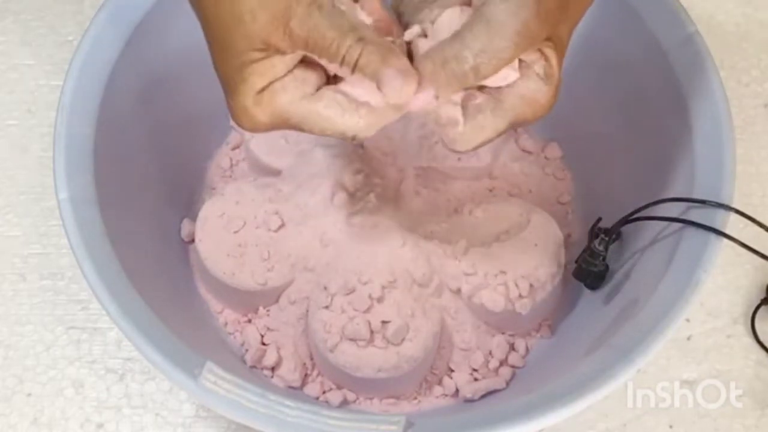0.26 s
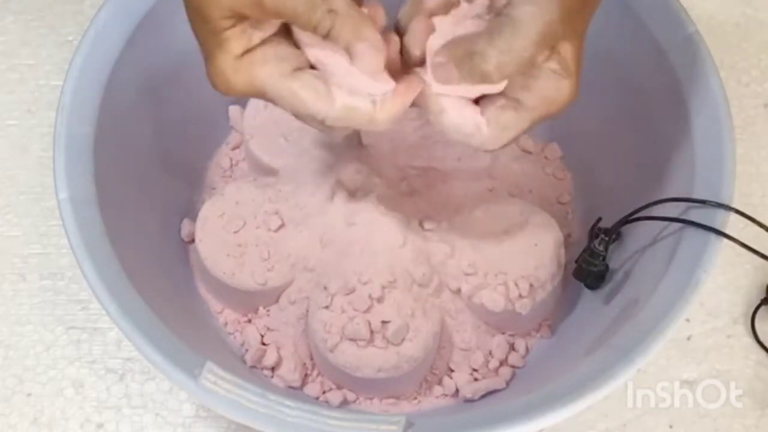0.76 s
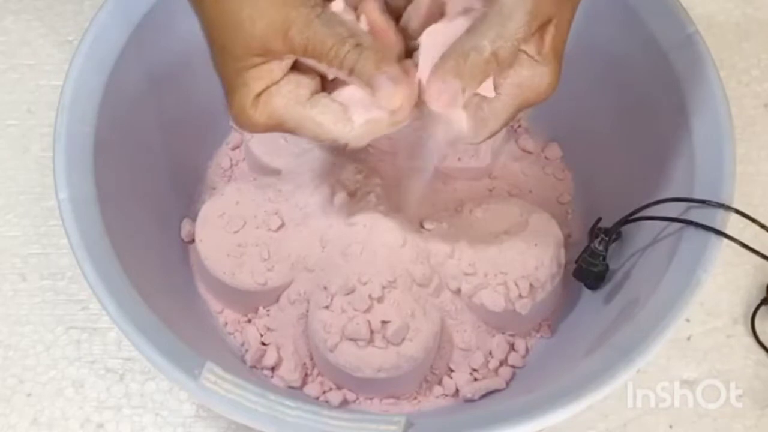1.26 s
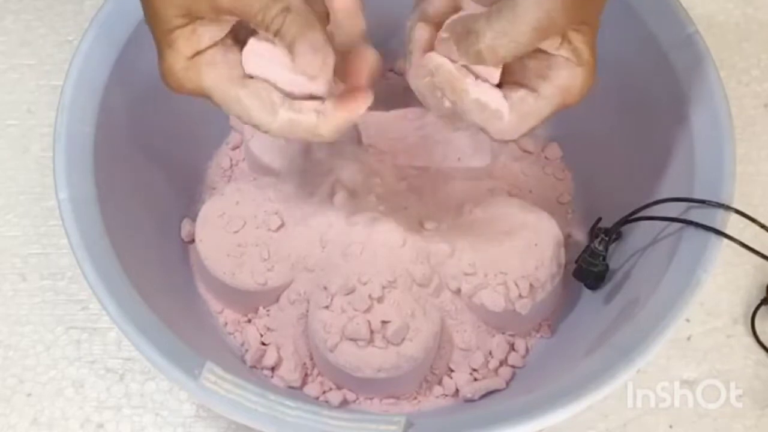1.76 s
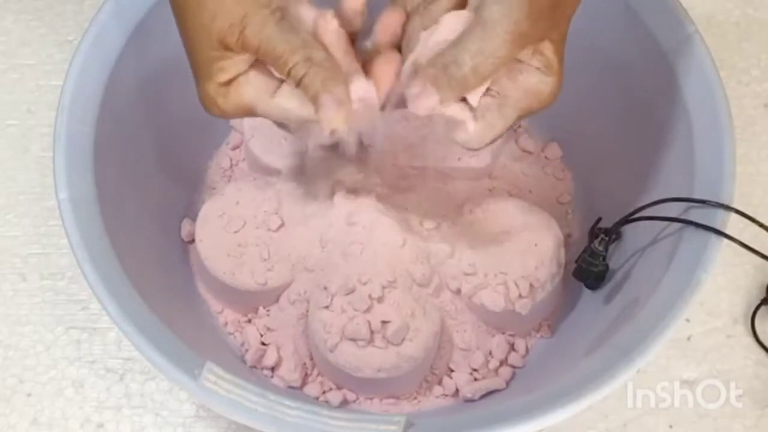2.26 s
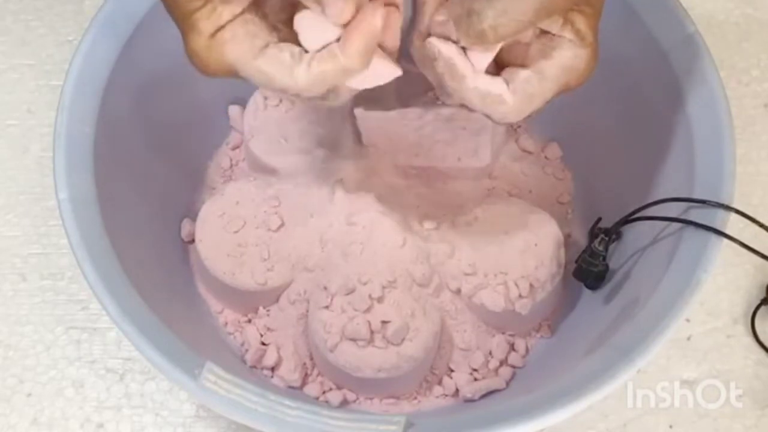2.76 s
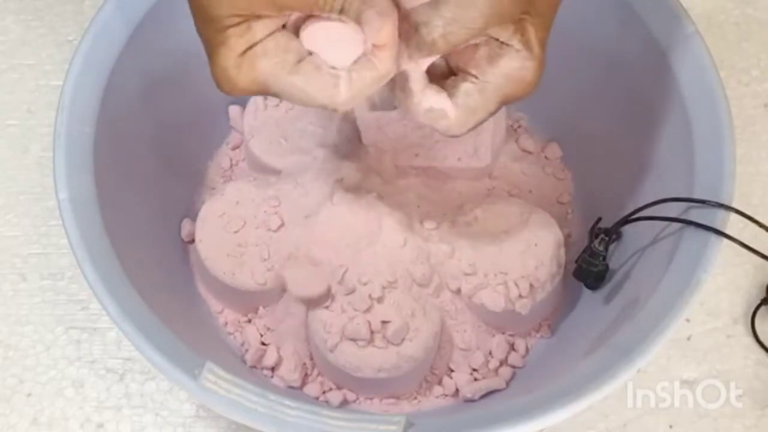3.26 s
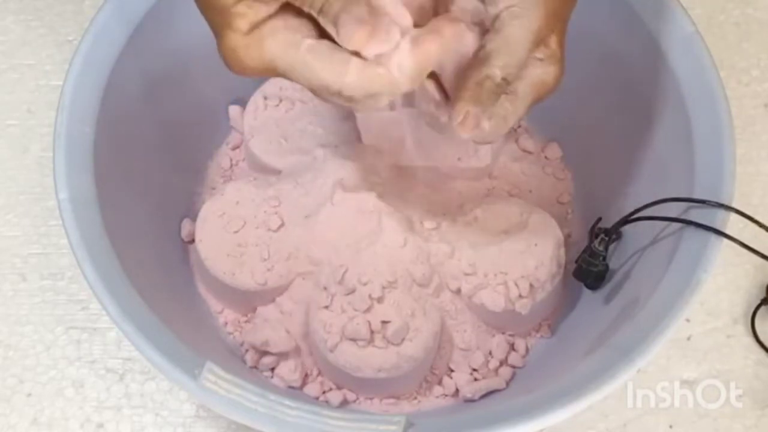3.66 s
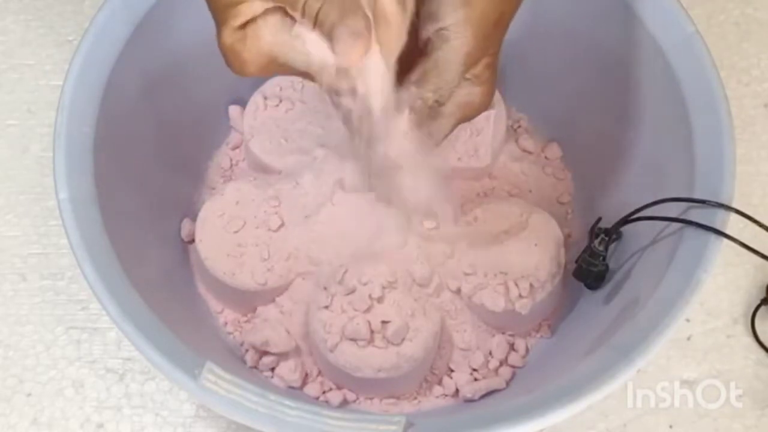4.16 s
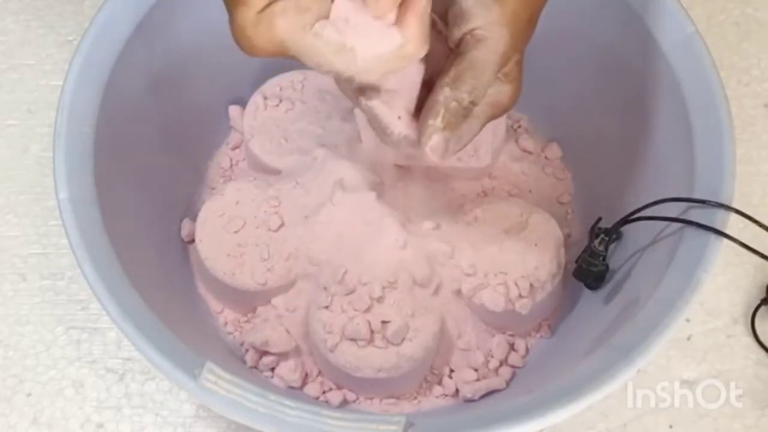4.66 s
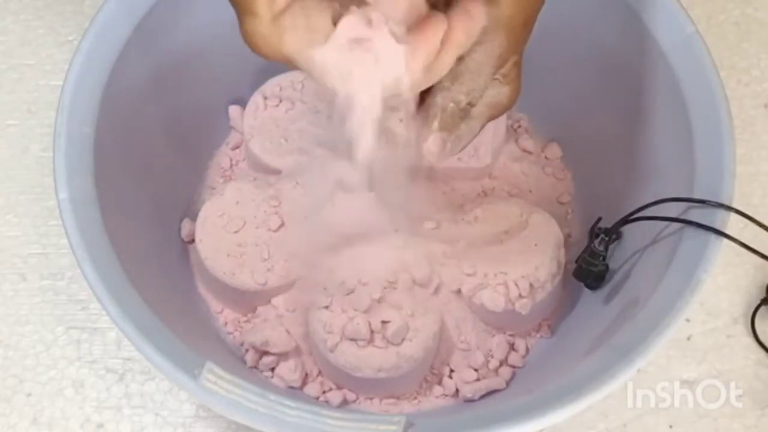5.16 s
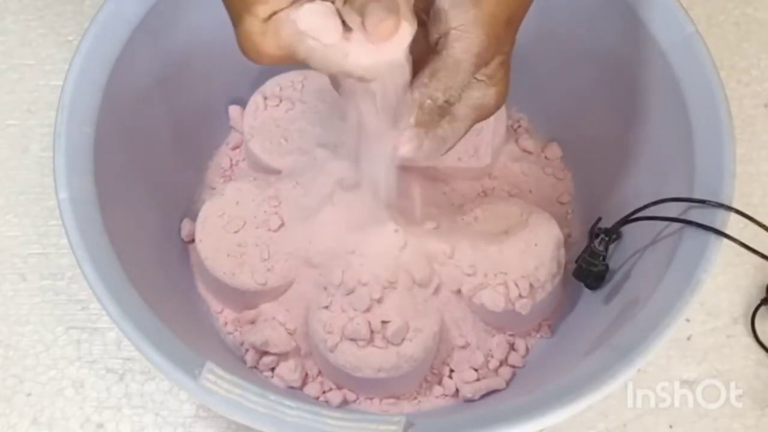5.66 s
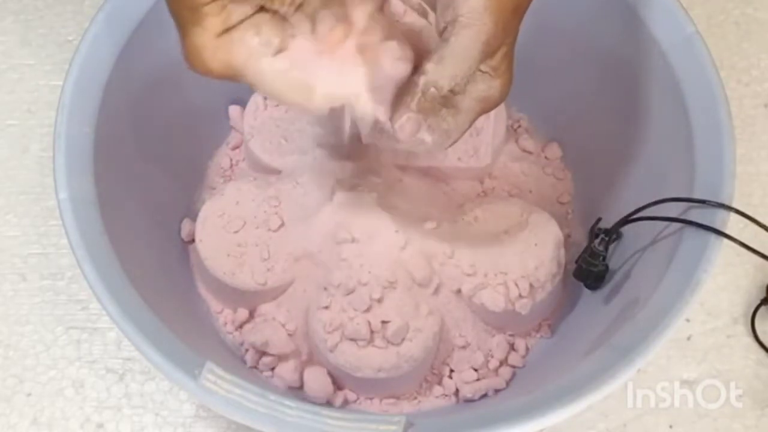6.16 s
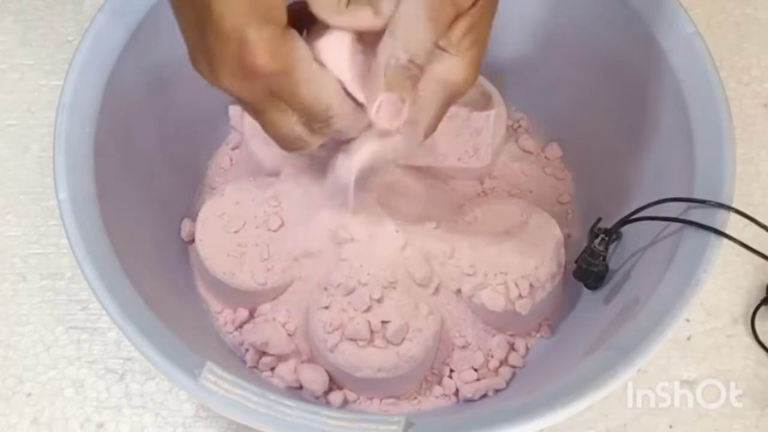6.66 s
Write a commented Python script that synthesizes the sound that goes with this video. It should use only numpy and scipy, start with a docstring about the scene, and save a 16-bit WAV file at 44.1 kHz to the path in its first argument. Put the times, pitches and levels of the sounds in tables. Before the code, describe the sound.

In a quiet room, a small microphone against a plastic tub hears powder cakes crumbled by hand. From 0 to 0.2 s several small hollow knocks and faint ticks open over soft, hissy sifting. Until 3 s it stays gentle: grainy powder comes in flurries, with light taps near 1.7, 1.9 and 2.1 s and a faint low wavering hum around 1.2 to 2.2 s. At 3.2 s a firm dull knock lands, followed at 3.4 s by a crunchy cluster of snaps and a brief rattle. Smaller drops follow around 4.3 s, then a bright hard crack at 4.63 s. From 5.1 to 5.7 s a dull, lumpy low rush suggests the tub shaken. Sharp cracks hit at 5.7 and 5.8 s, then the loudest ringing clatter at 6.0 to 6.2 s, with low rumble. Powder patters to 6.4 s, thinning into faint taps and quiet by 6.9 s.

```python
"""In a quiet room, hands crumble pressed powder cakes over a plastic tub, a small mono microphone against its wall.
Powder sifts down as shaped grainy noise; lumps snap and drop in as damped sines with debris noise, ringing the wall.
Under them the tub rocks, booms and rumbles in bands of low noise, and dry cracks are short noise bursts.
A low wavering sine hums for a moment, resonant grains rattle, and shaped grainy noise makes a dull, lumpy low rush,
as of the tub being shaken."""
import sys
import numpy as np
from scipy import signal
from scipy.fft import rfft, irfft, next_fast_len
from scipy.io import wavfile
from scipy.ndimage import map_coordinates

SR = 44100
rng = np.random.default_rng(int(sys.argv[2]) if len(sys.argv) > 2 else 0)


def unload_audio(sound):
    """Save the sound as a 16-bit wav file, at the path given as the first command line argument."""
    columns = np.transpose(np.atleast_2d(sound))
    # keep every value between -1 and 1, then stretch to whole-number steps
    steps = np.round(np.clip(columns, -1, 1) * 32767)
    wavfile.write(sys.argv[1], SR, steps.astype(np.int16))


N = 305172


def amp(db):
    """Decibels to linear gain."""
    return 10 ** (np.asarray(db) / 20)


def unit(x):
    """x scaled to rms 1."""
    return x / np.sqrt(np.mean(x ** 2) + 1e-20)


def curves(rows):
    """One value per sample for each column after the time."""
    s, *cols = np.transpose(rows)
    return [np.interp(np.arange(N) / SR, s, c) for c in cols]


def wobble(rate):
    """A smooth random curve, rate knots a second."""
    knots = rng.standard_normal(int(N * rate / SR) + 4)
    return map_coordinates(knots, [np.arange(N) * rate / SR])


def during(rows, fade):
    """1 while a table runs, fading at both ends over fade seconds."""
    t = np.arange(N) / SR
    fade_in = np.clip((t - rows[0][0]) / fade, 0, 1)
    fade_out = np.clip((rows[-1][0] - t) / fade, 0, 1)
    return fade_in * fade_out


def filtered(x, response):
    """x times a response of frequency."""
    m = next_fast_len(N + SR // 2)
    return irfft(rfft(x, m) * response(np.fft.rfftfreq(m, 1 / SR)), m)[..., :N]


def coloured(x, points):
    """x shaped by (Hz, dB) points on a log axis, at rms 1."""
    f, db = np.transpose(points)
    return unit(filtered(x, lambda hz: amp(np.interp(np.log(hz + 1), np.log(f + 1), db))))


def resonant(x, hz, q):
    """x through one resonance, at rms 1."""
    return unit(signal.lfilter(*signal.iirpeak(hz, q, SR), x))


def edge(hz):
    """A treble edge, falling to nothing at 11950 Hz; three short hiss bursts are cut to lie past it."""
    return np.clip((11950 - hz) / 300, 0, 1)


def patter(rate, spread_db, share):
    """Tiny impacts of widely spread size, rate a second, mixed into smooth noise by their share of the power."""
    chance, size = rng.random(N), rng.exponential(size=N)
    sign, smooth = rng.standard_normal(N), rng.standard_normal(N)
    grains = unit((chance < rate / SR) * amp(spread_db * size) * sign)
    share = np.clip(share, 0, 1)
    return np.sqrt(share) * grains + np.sqrt(1 - share) * smooth


def place(s, t):
    """Samples of an event; the contact builds up briefly before it sounds."""
    start = round((s + 0.001137) * SR)
    return slice(start, start + len(t))


def ringing(table, t, hz, reach_db, t60):
    """Damped sines at slightly new strengths; modes far from the blow's pitch lose reach_db per octave."""
    scatter_db = rng.normal(0, 1.5, len(table))
    total = 0
    for (f, db, decay), extra in zip(table, scatter_db):
        distance_octaves = abs(np.log2(f / hz))
        level_db = db + extra - reach_db * distance_octaves - 60 * t / (t60 * decay)
        total = total + amp(level_db) * np.sin(2 * np.pi * f * t)
    return total


def burst(t, length):
    """A noise envelope that swells briefly to 1 and dies, about 44 dB down after length seconds."""
    u = t * np.log(1000) / length * 1.18
    return u * np.exp(1 - u)


def shake():
    """The tub rocks below hearing, booms and rumbles as the heap shifts; a shove raises all three and dies away."""
    # The tub under the microphone. Each row: time in seconds, rocking, boom and wall rumble levels in dB.
    shake_levels = [(0, -40, -53, -56), (.1, -32, -52, -69), (.4, -34, -57.5, -69), (1, -34, -50, -61),
                    (1.15, -33, -62, -71), (1.6, -34.5, -58, -56), (2.3, -34, -63, -60),
                    (2.42, -36, -58, -57), (2.77, -44.5, -66.5, -68), (3.05, -24, -43, -72),
                    (3.2, -33.5, -46, -52), (3.38, -26, -47, -48.5), (3.64, -50, -59, -68),
                    (3.81, -26.5, -56, -63), (4.1, -36.5, -59.5, -61.5), (4.35, -37.5, -57, -56),
                    (4.5, -30, -61, -63), (4.66, -34, -37, -45), (4.9, -33.5, -64, -68),
                    (5.0, -27, -46, -51), (5.8, -39, -68, -60), (6.03, -25.5, -52.5, -53),
                    (6.1, -43, -55, -30.5), (6.3, -35, -43.5, -55), (6.37, -45, -58, -65.5),
                    (6.61, -27, -56.5, -65.5), (6.92, -34, -60, -62)]
    # The tub is pushed. Each row: start in seconds, nominal seconds to fall 10 dB,
    # then what it adds to rocking, boom and wall rumble in dB.
    shoves = [(1.17, 0.75, -19, -55, -44.5), (5.1, 0.28, -12, -40, -29)]
    # How fast rocking, boom and rumble die, one factor each on the shove's rate of fall.
    settles = [1.12, 0.81, 4.3]
    # Spectra of the three bands. Each row: frequency in Hz, density in dB per Hz.
    rocking_spectrum = [(2, -11), (5, -4.5), (12, -4.5), (20, -11), (30, -17), (42, -31.5), (70, -120)]
    boom_spectrum = [(20, -120), (38, -21), (55, 7.5), (76, 2), (105, 5), (130, -19), (180, -120)]
    rumble_spectrum = [(80, -120), (115, -5), (170, 1.5), (240, -0.5), (340, -13.5), (500, -120)]
    shove_rise_s = 0.041

    level = amp(curves(shake_levels))
    for s, fall_s, *peak_db in shoves:
        since = np.clip(np.arange(N) / SR - s, 0, None)
        rise = np.clip(since / shove_rise_s, 0, 1)
        fall = amp(-10 * np.outer(settles, since) / fall_s)
        level = level + amp(peak_db)[:, None] * rise * fall

    rocking = level[0] * coloured(rng.standard_normal(N), rocking_spectrum)
    rocking = filtered(rocking, lambda f: 1 / (1 + (f / 30) ** 6))  # a heavy tub cannot move fast
    boom = level[1] * amp(1.8 * wobble(9)) * coloured(rng.standard_normal(N), boom_spectrum)
    rumble_grains = patter(67, 0.91, share=0.31)
    rumble = level[2] * amp(2.9 * wobble(24)) * coloured(rumble_grains, rumble_spectrum)
    return rocking + boom + rumble


def powder():
    """Coarse bits excite the heap and wall, dust hisses; all come in shared flurries."""
    # Coarse powder falling. Each row: time in seconds, heap level in dB, crumbs level in dB.
    heaping = [(0, -50, -53), (.1, -53, -52), (.29, -54, -55), (.44, -56.5, -57.5), (.96, -52, -51),
               (1.25, -54.5, -58.5), (1.55, -56.5, -55), (1.75, -51.5, -52), (1.89, -50.5, -48.5),
               (2.04, -52, -50), (2.17, -48.5, -47.5), (2.35, -56, -57), (2.81, -58.5, -57),
               (3.35, -47, -52.5), (3.51, -62, -56), (3.72, -56, -56.5), (3.97, -56, -52.5),
               (4.22, -52.5, -53.5), (4.37, -63, -60), (4.57, -47.5, -51.5), (4.7, -55, -52),
               (5.0, -56, -55.5), (5.2, -39.5, -59), (5.34, -38.5, -57.5), (5.65, -43, -52),
               (5.8, -51.5, -49.5), (5.9, -46.5, -44), (6.05, -52, -63), (6.23, -47, -45),
               (6.3, -41.5, -51), (6.4, -51, -49.5), (6.47, -52.5, -59), (6.92, -54.5, -55.5)]
    # Fine dust sifting through the fingers. Each row: time in seconds, level in dB.
    dustfall = [(0, -48), (.3, -46.5), (.55, -46.5), (.66, -46), (.8, -49), (1.06, -46), (1.27, -53),
                (1.52, -52), (1.7, -51.5), (1.9, -47.5), (2.15, -45), (2.32, -49), (2.62, -70),
                (2.87, -51.5), (3.13, -50), (3.4, -46.5), (3.5, -53.5), (3.8, -52.5), (3.89, -65),
                (4.02, -46.5), (4.18, -42), (4.35, -46), (4.54, -45), (4.7, -51.5), (4.9, -52.5),
                (5.01, -42), (5.17, -54), (5.5, -54.5), (5.72, -49), (5.86, -37), (6.02, -53.5),
                (6.2, -39.5), (6.38, -44), (6.48, -65), (6.69, -50), (6.92, -60)]
    # The sifting thins for a moment as the fingers shift their grip.
    # Each row: centre in seconds, depth in dB, half width in seconds (to 1/e of the depth).
    lulls = [(.24, 6, 0.027), (0.359, 15, 0.024), (.47, 16, 0.043), (.63, 7.5, 0.059), (.77, 9, 0.02),
             (1.41, 12, 0.035), (1.61, 8, 0.055), (2.26, 7, 0.013), (2.43, 12, 0.071), (2.56, 0, 0.013),
             (2.78, 1.5, 0.043), (3.31, 7, 0.043), (3.59, 13, 0.039), (3.73, 4, 0.02), (4.28, 11.5, 0.07),
             (4.42, 11, 0.082), (4.62, 4, 0.01), (5.1, 19, 0.044), (5.23, 13, .03), (5.91, 15, 0.071),
             (6.272, 15.5, 0.093), (6.541, 22, 0.038), (6.75, 5, .03)]
    # Spectra of the three layers. Each row: frequency in Hz, density in dB per Hz.
    heap_spectrum = [(220, -120), (320, -14), (440, -5.5), (570, 0), (760, -10.5), (920, -4.5), (1150, -19),
                     (1700, -32.5), (2600, -120)]
    crumbs_spectrum = [(800, -120), (1150, -4), (1600, 1.5), (2100, -2.5), (2800, -6.5), (3400, -7.5),
                       (4700, -17), (7000, -120)]
    dust_spectrum = [(2500, -120), (4600, -24.5), (6200, -11), (7800, -7.5), (9400, -3), (10800, -6.5),
                     (11650, -16), (12100, -79)]
    crumbs_follow, heap_follows = 0.41, 0.16  # share of a lull that the coarser layers take

    heap_db, crumbs_db = curves(heaping)
    dust_db, = curves(dustfall)
    flurry = wobble(15) + 1.09 * wobble(55)
    t = np.arange(N) / SR
    lull_db = sum(db * np.exp(-((t - s) / half) ** 2) for s, db, half in lulls)

    heap_level = amp(heap_db - heap_follows * lull_db + 0.82 * flurry)
    heap = heap_level * coloured(patter(300, 3.1, share=0.32), heap_spectrum)
    crumbs_level = amp(crumbs_db - crumbs_follow * lull_db + 1.8 * flurry)
    crumbs = crumbs_level * coloured(patter(900, 2.2, share=0.15), crumbs_spectrum)
    dust_level = amp(dust_db - lull_db + 1.6 * flurry)
    dust = dust_level * coloured(patter(3400, 0.89, share=0.38), dust_spectrum)
    return heap + crumbs + dust


def room_tone():
    """The quiet room and the microphone's own hiss, as steady shaped noise."""
    # Spectrum of the stillness. Each row: frequency in Hz, density in dB per Hz.
    still_spectrum = [(18, -29), (30, -2.5), (45, -20), (65, -24), (131, -18), (345, -13), (554, -27.5),
                      (890, -16), (1090, -44), (1620, -46.5), (4610, -33.5), (9500, -26), (11600, -33),
                      (15100, -74.5), (22000, -120)]
    still_db = -57.5  # rms ahead of the treble edge
    return amp(still_db) * filtered(coloured(rng.standard_normal(N), still_spectrum), edge)


def lumps():
    """Each blow rings the wall near its own pitch, thuds the floor, chatters and sheds debris noise."""
    # Lumps snapping and landing. Each row: time in seconds, blow level in dB, favoured ring pitch in Hz,
    # thud and debris in dB relative to the blow, ring t60 in seconds, narrowness in dB lost per octave.
    blows = [(0.018, -18, 525, -15.5, -23.5, 0.028, 35), (0.041, -32, 1800, -28, -25, 0.042, 26),
             (0.07, -14, 840, -16.5, -25, 0.0194, 15), (0.171, -17.5, 556, -19, -26, 0.025, 22.5),
             (0.615, -34.5, 885, -5, -24, 0.029, 14), (1.004, -39, 880, -7, -32, .028, 18),
             (1.171, -38.5, 620, -2, -5, 0.017, 18.5), (1.705, -31, 1890, -24, -28, 0.069, 21),
             (1.891, -28.5, 1770, -32, -27, 0.037, 29), (2.111, -30, 606, -6.5, -28.5, 0.024, 14),
             (3.013, -22.5, 502, -8.5, -20.5, 0.031, 12), (3.229, -5, 540, -29, -29, 0.021, 24),
             (3.278, -29, 560, -23, -12.5, 0.029, 20.5), (3.36, -33.5, 818, -16, -9, .028, 20),
             (3.384, -22.5, 1330, -23, -22, .04, 15), (3.408, -13, 1490, -9, -13.5, 0.029, 27),
             (3.428, -31, 1400, -26, -31, 0.038, 7), (3.431, -13, 1540, -13, -32, 0.028, 15),
             (3.447, -25, 1330, -11, -41.5, .035, 10), (3.472, -35, 1320, -7.5, -36, 0.037, 17),
             (3.857, -25.5, 560, -5.5, -30, 0.033, 24), (3.882, -30, 526, -2, -11, 0.024, 28),
             (4.092, -27, 690, -27, -18, 0.014, 9.5), (4.258, -28.5, 950, -13, -19, 0.022, 19),
             (4.286, -34, 584, -15, -28, .021, 16), (4.299, -22, 870.5, -27, -45.5, .033, 38),
             (4.354, -20.5, 526, -13.5, -19.5, 0.025, 10), (4.379, -34, 480, -32, -15, 0.059, 7),
             (4.634, -2.5, 1900, -36, -31, .022, 19.5), (4.635, -13, 880, -38, -40, 0.0245, 36),
             (4.698, -33.5, 550, -18, -5, 0.015, 16), (4.762, -21, 640, -13.5, -38, 0.02, 18),
             (4.993, -30, 530, -24, -12, 0.021, 18), (5.235, -25, 533, -9, -27, 0.017, 10),
             (5.278, -33, 834, -3, -6, 0.017, 18), (5.507, -25.5, 498, -27.5, -22, 0.035, 10.5),
             (5.512, -21, 520, -9, -30, 0.02, 30), (5.55, -33, 608, -0.5, -33, 0.032, 8),
             (5.693, -27, 1300, -18, -30, 0.023, 15), (5.708, -8.5, 2020, -48, -26.5, 0.04, 19.5),
             (5.76, -25.5, 1350, -20, -12, 0.022, 14.5), (5.808, -9.5, 2300, -31, -27.5, 0.047, 18.5),
             (6.004, -27, 860, -25.5, -7.5, 0.025, 11), (6.009, -21, 460, -3, -36.5, 0.039, 14.5),
             (6.02, -17, 496, -19, -42, .02, 10.5), (6.028, -12, 2240, -30, -45.5, 0.019, 19),
             (6.051, -19, 1310, -6.5, -18, 0.0204, 16), (6.08, 11, 1200, -25.5, -31.5, 0.038, 16),
             (6.099, -5.5, 834, -15, -54.5, 0.037, 27), (6.119, -22.5, 1260, -5, -22, 0.048, 18),
             (6.133, -16.5, 1220, -16.5, -20, 0.048, 12), (6.133, -11.5, 536, -20, -30, 0.024, 13),
             (6.158, -14.5, 545, -25, -23.5, 0.02, 21), (6.174, -23.5, 1320, -25, -25, .035, 18.5),
             (6.181, -18.5, 1290, -8.5, -22.5, 0.022, 27), (6.304, -23.5, 590, -12.5, -25, .022, 9.5),
             (6.367, -33, 1400, -43, -18.5, .024, 19.5), (6.634, -37, 665, -12.5, -10.5, 0.044, 23),
             (6.756, -34.5, 826, -34, -15, 0.021, 13)]
    # Modes of the tub wall. Each row: frequency in Hz, strength in dB, decay relative to the blow's t60.
    wall_modes = [(551, 8.5, 0.6), (716, 0.5, .8), (881, 2, 0.71), (1110, -11, 1), (1290, 3, 0.71),
                  (1496, -2.5, 0.68), (1898, 4.5, 0.38), (2255, -5.5, 0.93), (2840, 3.5, 0.31),
                  (3420, -3.5, 0.63), (4734, 13.5, 0.34)]
    # Modes of the tub floor. Each row: frequency in Hz, strength in dB, decay relative to the thud's t60.
    floor_modes = [(74.5, -0.95, 1.6), (104, -0.41, 1.73), (132, 1, 1.75), (203, 1, 1.18), (305, -2, 0.69)]
    # Spectrum of the debris. Each row: frequency in Hz, density in dB per Hz.
    debris_spectrum = [(150, -120), (300, 5.5), (570, 4.5), (760, -1), (920, 6.5), (1100, -10), (1350, 2.5),
                       (2100, -5), (3000, -14.5), (4500, -23), (9000, -29), (11650, -49), (12100, -89)]
    # chatter relative to a blow at -16 dB; falls further behind harder blows, dB per dB
    chatter_db, chatter_sinks = -27, .3
    rise_cycles = 0.47  # time constant of the wall's build-up, in cycles of the blow's pitch

    t = np.arange(SR // 3) / SR
    ring, debris = np.zeros((2, N + SR))
    for s, db, hz, thud_db, debris_db, t60, narrow_db in blows:
        wall = -ringing(wall_modes, t, hz, narrow_db, t60)
        wall = wall * (1 - np.exp(-t * hz / rise_cycles))
        floor = -ringing(floor_modes, t, 150, 2.3, 0.069)
        floor = floor * (1 - np.exp(-t / 0.00077))
        chatter_level = amp(chatter_db - chatter_sinks * (db + 16) - 60 * t / 0.18)
        chatter = chatter_level * resonant(rng.standard_normal(len(t)), hz, q=21)
        chatter = chatter * (1 - np.exp(-t / 0.0019))
        ring[place(s, t)] += amp(db) * (wall + amp(thud_db) * floor + chatter)
        debris[place(s, t)] += amp(db + debris_db - 60 * t / 0.21) * (1 - np.exp(-t / 0.0006))

    # the debris comes down in uneven clumps
    clumps = amp(3 * wobble(110))
    shed = debris[:N] * clumps * coloured(patter(500, 1.7, share=0.32), debris_spectrum)
    return filtered(ring[:N] + shed, edge)


def cracks():
    """Short broad bursts of noise, each tilted to its own centre; faint ones fall at random."""
    # Dry cracks. Each row: time in seconds, level in dB, centre in Hz.
    ticks = [(0.023, -40, 2070), (0.0717, -41, 2130), (0.175, -31, 7400), (0.396, -35.5, 9750),
             (1.7023, -30, 2020), (1.8914, -41, 2030), (2.114, -29, 9640), (2.877, -42, 9370),
             (3.017, -28, 8600), (3.231, -29.5, 7200), (3.271, -47, 2160), (3.2934, -56, 2170),
             (3.3164, -49, 2010), (3.3829, -26.5, 2450), (3.4109, -16.5, 2690), (3.415, -22, 2320),
             (3.432, -30, 2290), (3.449, -34, 2130), (3.4634, -38, 2440), (3.5462, -32.5, 6040),
             (3.858, -33, 9010), (3.8817, -33, 7050), (4.0926, -26.5, 7400), (4.2597, -42, 2070),
             (4.354, -35, 3830), (4.371, -30.5, 7680), (4.378, -43, 2000), (4.3897, -31, 2800),
             (4.6362, -16, 1930), (4.6974, -38, 2000), (4.7077, -35, 2040), (4.766, -35, 9870),
             (4.996, -47, 9120), (5.231, -41, 2010), (5.2866, -36.5, 2700), (5.329, -39.5, 2170),
             (5.5145, -26.5, 8800), (5.7095, -18, 1990), (5.7609, -24.5, 3280), (5.769, -36, 7000),
             (5.773, -26, 3600), (5.7987, -18, 8560), (5.8089, -6, 2260), (5.8353, -34, 2740),
             (5.8444, -35, 2780), (5.8574, -32, 2360), (5.9424, -43, 2800), (6.0184, -40, 2270),
             (6.0293, -5.5, 8900), (6.0506, -29, 2000), (6.0762, -29.5, 5000), (6.0827, -8, 2010),
             (6.0845, -12, 3510), (6.135, -20.5, 2050), (6.182, -34.5, 2010), (6.3684, -42, 2190),
             (6.3807, -38, 2640), (6.3925, -33, 2290), (6.405, -32, 9260)]
    # the faint cracks in between: lowest level, lowest centre, range above it
    faint_db, faint_hz, faint_octaves = -58.5, 2060, 2.3
    # length of a -31 dB crack at 2 kHz; brighter cracks are shorter, by this power of pitch
    crack_length_s, crack_shortens = 0.0074, 0.4
    hard_shortens = 0.13  # harder cracks are shorter: dB of length lost per dB over -31

    t = np.arange(SR // 20) / SR
    body = np.zeros(N + SR)
    faint = [(u * N / SR, faint_db + 6 * v, faint_hz * 2 ** (faint_octaves * w))
             for u, v, w in rng.random(size=(24, 3))]
    for s, db, hz in ticks + faint:
        length = crack_length_s * (2000 / hz) ** crack_shortens * amp(-hard_shortens * (db + 31))
        noise = resonant(rng.standard_normal(len(t)), min(hz, 11000), q=1.0)
        body[place(s - .001, t)] += amp(db) * burst(t, length) * noise
    # the cracks keep little below 1500 Hz
    return filtered(body[:N], lambda f: edge(f) / (1 + (1500 / (f + 1)) ** 4))


def hum():
    """A low sine, wavering in pitch and level, that fades in and out."""
    # A low hum comes up for a moment. Each row: time in seconds, level in dB.
    hum_levels = [(1.12, -62), (1.168, -42), (1.276, -34), (1.464, -38), (1.58, -54.5), (1.926, -38),
                  (2.192, -54), (2.402, -57), (2.438, -74.5), (2.5, -57)]
    hum_hz = 73.2
    db, = curves(hum_levels)
    phase = 2 * np.pi * np.cumsum(hum_hz + 1.78 * wobble(21)) / SR
    level = during(hum_levels, 0.076) * amp(db + 1.2 * wobble(12.7))
    return np.sqrt(2) * level * np.sin(phase)


def rattle():
    """Uneven grains drive a narrow resonance, then a wider one on the same note."""
    # A crumbling lump keeps one note of the wall rattling.
    # Each row: start in seconds, length in seconds, level in dB, pitch in Hz.
    rattles = [(3.345, .17, -40.5, 1356), (6.095, 0.13, -36, 1310), (6.22, 0.11, -42, 1304)]
    t, out = np.arange(N) / SR, 0
    for s, length, db, hz in rattles:
        swell = np.sin(np.pi * np.clip((t - s) / length, 0, 1)) ** .6
        level = amp(db + 2.05 * wobble(45)) * np.abs(swell)
        grains = patter(150, 2.12, share=0.97)
        out = out + level * resonant(resonant(grains, hz, q=15), hz, q=4.9)
    return out


def low_rush():
    """A dull, lumpy low rush of grainy noise, as of the tub being shaken."""
    # Course of the rush. Each row: time in seconds, level in dB.
    rush_levels = [(5.04, -59), (5.15, -36), (5.3, -40), (5.68, -47)]
    # Spectrum of the rush. Each row: frequency in Hz, density in dB per Hz.
    rush_spectrum = [(120, -20), (200, 1), (355, -2), (547, -6.5), (747, -7), (949, -14), (1610, -29),
                     (1920, -24), (3500, -43), (4550, -64.5), (7700, -120)]
    db, = curves(rush_levels)
    level = during(rush_levels, 0.059) * amp(db + 2.4 * wobble(35))
    return level * coloured(patter(400, 1.3, share=0.49), rush_spectrum)


def hiss_bursts():
    """Three very short, faint bursts of hiss above the treble edge: noise with everything under it cut away."""
    # The bursts. Each row: time in seconds, level in dB ahead of the cut.
    bursts = [(5.8082, -27.5), (6.029, -30), (6.0826, -33)]
    t = np.arange(SR // 20) / SR
    top = np.zeros(N + SR)
    for s, db in bursts:
        top[place(s, t)] += amp(db) * burst(t, 0.0046) * rng.standard_normal(len(t))
    return filtered(top[:N], lambda f: 1 - edge(f))


def scene():
    """Everything reaches one microphone, copied to two equal channels."""
    tub = shake() + powder() + room_tone()
    events = lumps() + cracks() + hum() + rattle() + low_rush() + hiss_bursts()
    return np.tile(tub + events, (2, 1))


def record(dry):
    """The input overloads near full scale; nothing is kept above the band limit."""
    top_hz = 16400
    clipped = dry / (1 + np.abs(dry / 0.9) ** 8) ** (1 / 8)
    return filtered(clipped, lambda hz: np.clip((top_hz - hz) / 250, 0, 1))


dry = scene()
out = record(dry)
unload_audio(out)
```